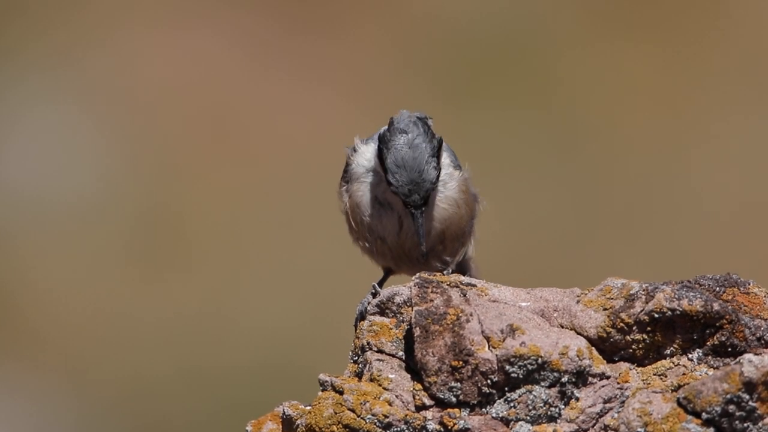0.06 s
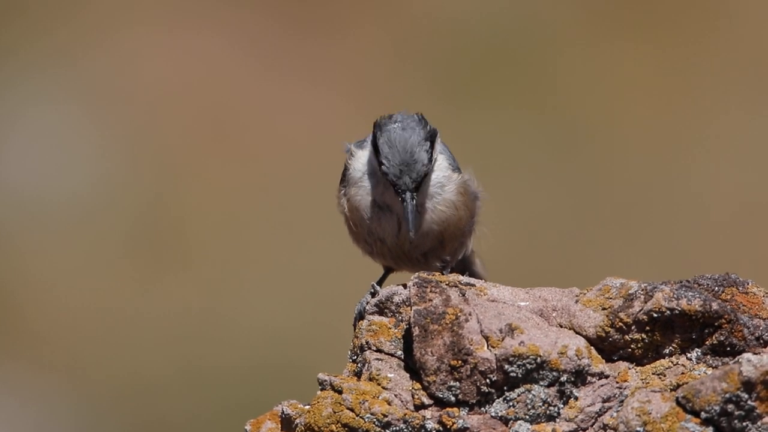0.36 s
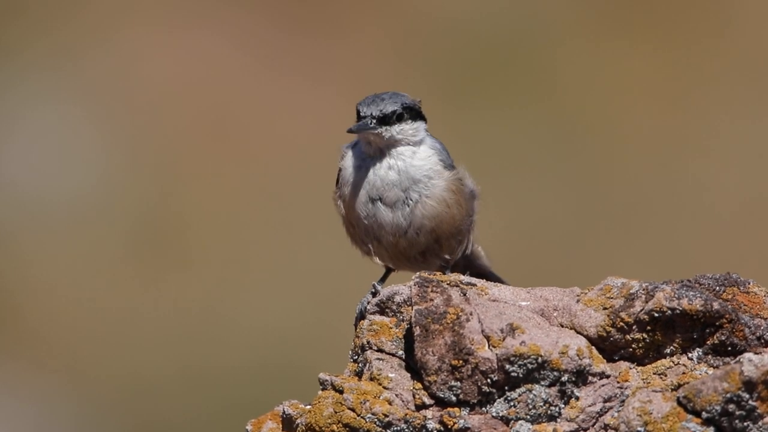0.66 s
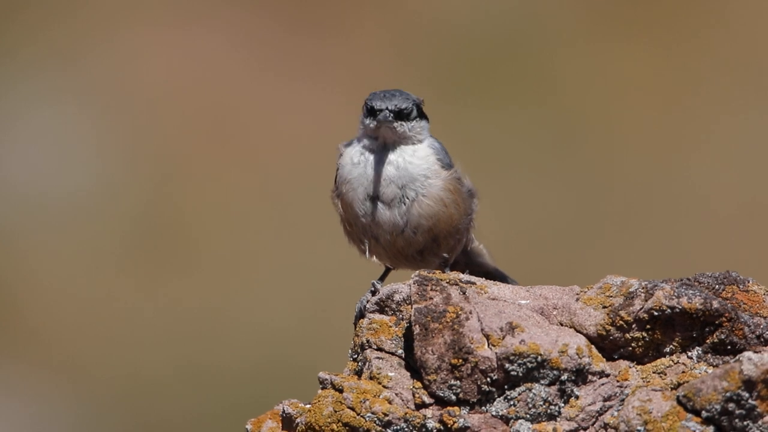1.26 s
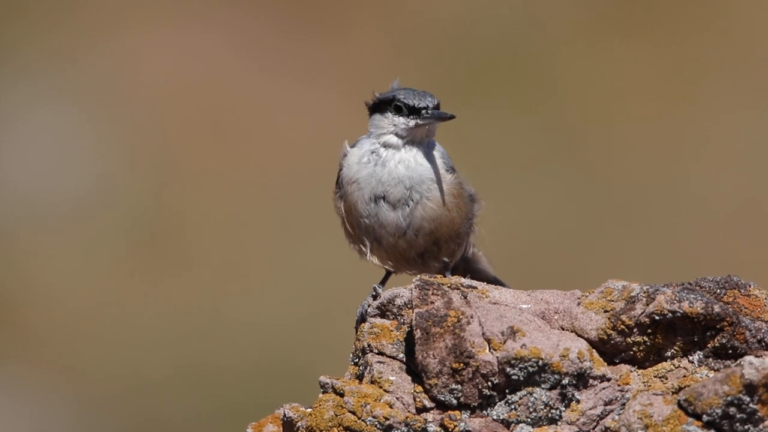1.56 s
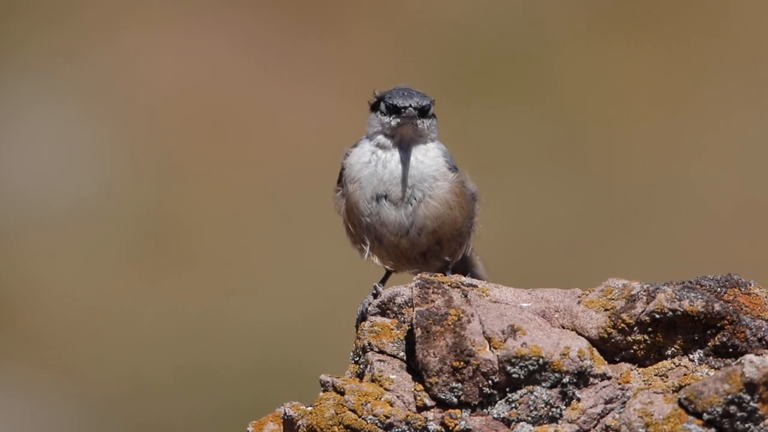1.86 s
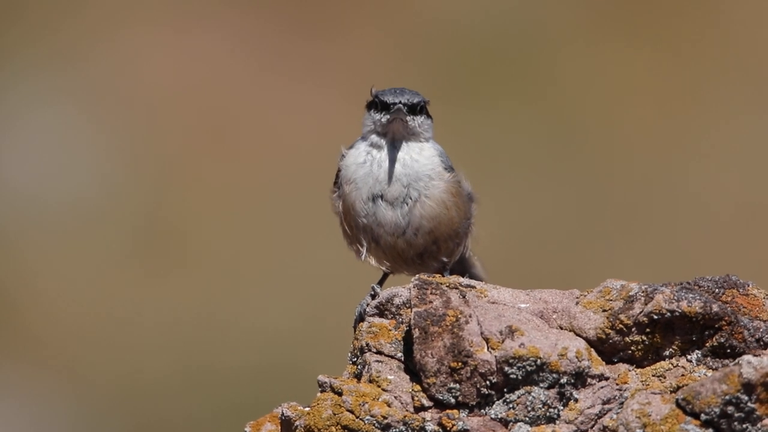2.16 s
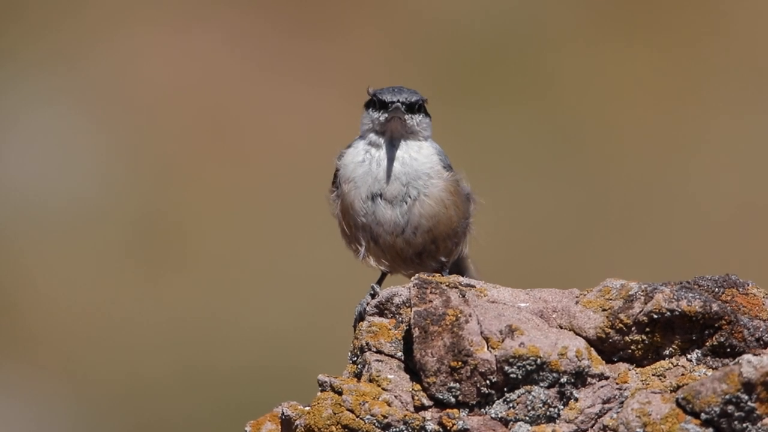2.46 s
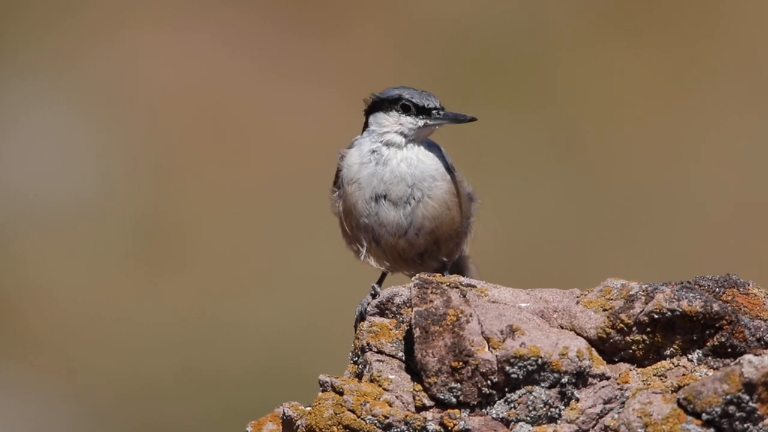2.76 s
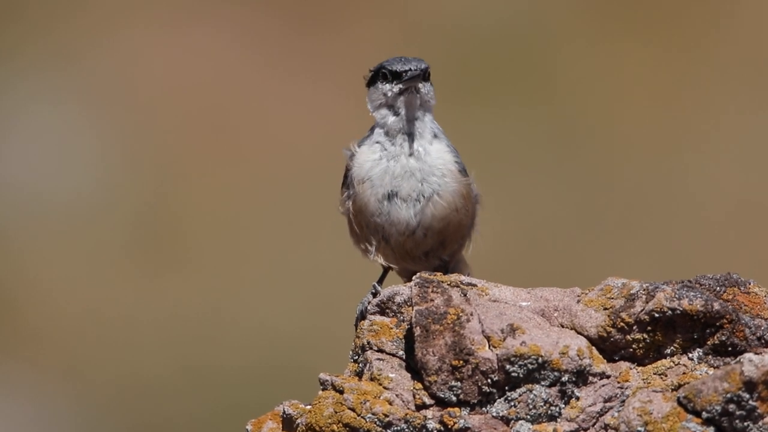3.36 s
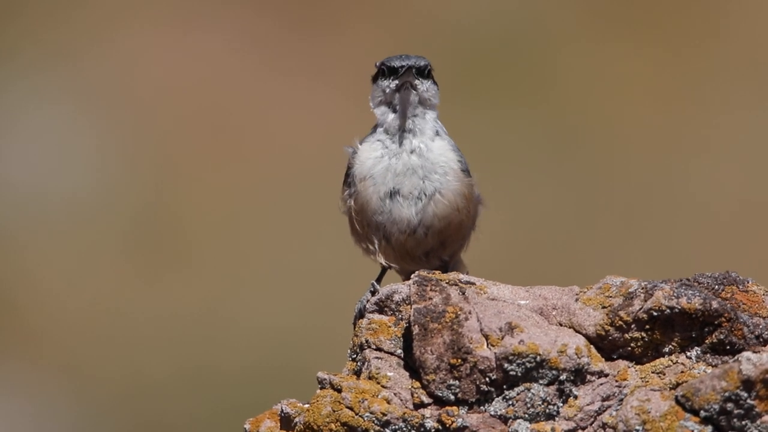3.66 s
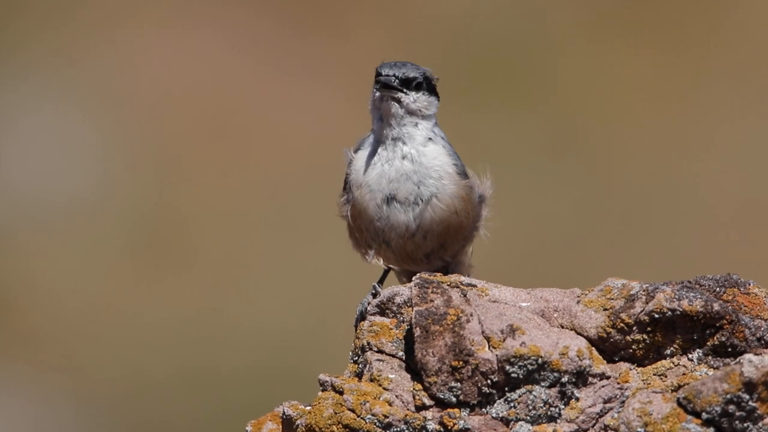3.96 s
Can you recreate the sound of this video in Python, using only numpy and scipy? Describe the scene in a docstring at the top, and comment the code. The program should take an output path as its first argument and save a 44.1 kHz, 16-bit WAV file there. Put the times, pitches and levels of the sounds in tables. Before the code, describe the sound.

A small bird gives four loud downward whistles over low wind rumble.

```python
"""Wind rumbles and thumps on the microphone from the start, over a thin, steady hiss.
About three seconds in, a nuthatch on a rock gives four loud whistles that swoop down and flick up.
Each is a near-pure tone that turns reedy at the bottom, where its second harmonic meets the throat
resonance, and a little hoarse with broken half tones. The rock and the far slopes answer faintly."""
import sys
import numpy as np
from scipy import signal
from scipy.fft import rfft, irfft
from scipy.io import wavfile
from scipy.ndimage import uniform_filter1d

SR = 44100
rng = np.random.default_rng(int(sys.argv[2]) if len(sys.argv) > 2 else 0)


def wrap_up_sound(samples):
    """Save the sound to the file named by the first command line argument, as 16-bit audio."""
    columns = np.atleast_2d(samples).T
    # keep every value between -1 and 1, then stretch to whole-number steps
    tamed = np.clip(columns, -1, 1)
    steps = np.round(tamed * 32767).astype(np.int16)
    wavfile.write(sys.argv[1], SR, steps)


N = 176400

# tone colour of the wind's low rumble and of its upper flutter: f/Hz, relative level/dB
RUMBLE_SPECTRUM = [(20, -34), (35, -31), (60, -11), (90, -4.5), (170, 1), (260, -0.5), (350, -3.5),
                   (480, -11), (700, -22), (1100, -31), (2000, -75.5)]
FLUTTER_SPECTRUM = [(150, -23), (400, 5.5), (650, 2.5), (900, -0.5), (1270, -10.5), (1600, -19),
                    (2000, -31), (3000, -47)]
# gusts, as a fader ride for each wind layer: t/s, level/dB before trim
RUMBLE_RIDE = [(0.0, -26.5), (0.04, -26.5), (0.08, -24.5), (0.1, -24.5), (0.24, -29.5), (0.28, -21.5),
               (0.53, -27), (0.89, -22), (0.91, -23.5), (0.96, -19.5), (1.12, -25.5), (1.17, -19),
               (1.2, -28.5), (1.24, -20.5), (1.63, -22.5), (1.66, -27), (1.82, -34), (1.85, -28),
               (1.98, -32), (2.13, -19), (2.16, -27), (2.46, -21.5), (2.48, -25), (2.65, -21),
               (2.75, -27.5), (2.81, -17), (2.84, -23), (3.09, -24.5), (3.11, -25), (3.14, -30.5),
               (3.17, -20), (3.23, -28), (3.27, -21), (3.34, -28.5), (3.43, -20.5), (3.56, -27),
               (3.61, -21), (3.65, -32.5), (3.7, -27.5), (3.73, -29), (3.82, -20), (3.85, -30),
               (3.97, -29.5), (4.0, -39)]
FLUTTER_RIDE = [(0.0, -48), (0.68, -47.5), (0.75, -41), (0.77, -42), (0.81, -35), (0.83, -38),
                (0.86, -32.5), (0.9, -36), (1.05, -36.5), (1.07, -63), (1.14, -38.5), (1.51, -41.5),
                (1.56, -34.5), (1.58, -48), (1.61, -35), (1.69, -59), (1.74, -48.5), (1.8, -60),
                (1.88, -49), (1.92, -53), (2.07, -51), (2.09, -39), (2.21, -44), (2.81, -38), (2.82, -28.5),
                (2.84, -43), (2.9, -43), (3.25, -39), (3.27, -29.5), (3.29, -40), (3.36, -62), (3.45, -31),
                (3.6, -46.5), (3.61, -49), (3.69, -58), (3.8, -41.5), (3.99, -65), (4.0, -46)]
RUMBLE_TRIM_DB, FLUTTER_TRIM_DB = -0.09, 1
EDDY_RATE_HZ, RUMBLE_EDDY_DB, FLUTTER_EDDY_DB = 169, 2, 4.5
# the hardest thumps of wind: start t/s, relative peak level/dB
BUFFET_HITS = [(0.03, -4.5), (0.749, -5), (0.813, -7), (0.871, -5), (1.169, -7.5), (1.494, -29),
               (1.538, -5), (1.593, -9), (2.088, -24), (2.412, -8.5), (2.545, -8), (2.636, -8), (2.818, -9),
               (3.104, -3), (3.157, -8.5), (3.272, -7.5)]
BUFFET_RISE_S, BUFFET_RUMBLE_DB, BUFFET_FLUTTER_DB = .0024, -9, -15.5  # flutter against the rumble hit
# tone colour of the hiss bed: f/Hz, relative level/dB
HISS_SPECTRUM = [(500, -4), (2000, 5), (3200, 2), (4900, -3.5), (7000, -1), (10000, -2.5), (13000, -5.5),
                 (15500, -8.5)]

# the four whistles: start t/s, relative level/dB, then, timed from that start,
# knee t/s, knee f/Hz, bottom t/s, bottom f/Hz, end t/s, end f/Hz
WHISTLES = [(2.981, -5, .062, 1930, .124, 1765, .141, 2608),
            (3.226, -1.5, .054, 2254, .136, 1825, .151, 2000),
            (3.479, -1.5, 0.057, 2356, .139, 1770, 0.1586, 2064),
            (3.745, -0.5, 0.06, 2426, .144, 1757, 0.161, 2010)]
# the pitch dive that opens every whistle: t/s from its start, f/Hz
OPENING_SWOOP = [(0, 4380), (.004, 4050), (.010, 3380), (.015, 3100), (.026, 2820)]
ATTACK_S, RELEASE_S, ROUNDING_S = .0046, .006, .022
# strength of the voice at each pitch: f/Hz, relative level/dB
VOICE_RESPONSE = [(1780, -31.5), (2000, -31), (2200, -23.5), (2450, -24.5), (2730, -15.5), (2860, -21.5),
                  (3030, -17.5), (3350, -26.5), (3700, -22.5), (4300, -32.5)]
JITTER, WAVER, SHIMMER_DB = .005, .0032, 1  # fast and slow pitch wobble (fractions), level tremble
# harmonics 2 to 8 against the fundamental, before throat colour and effort: level/dB
HARMONIC_LEVELS = [-26.5, -35.5, -41, -52, -46, -43, -43]
# the EQ that throat and bill put on the overtones: f/Hz, level/dB
THROAT_EQ = [(3600, 20.5), (4050, 18), (4400, 1.5), (5100, -10), (5600, 0), (6200, 0.5), (7200, 0),
             (8200, 2.5), (10400, 5), (11400, 0), (13300, 10), (15500, -2)]
EFFORT_BRIGHTNESS = .46  # extra dB of overtones per dB of whistle level
FLARE_DB, FLARE_RATE_HZ = 3.5, 74  # each overtone flickers on its own
HOARSE_BELOW_HZ, HOARSE_FADE_HZ, RASP_RATE_HZ = 2154, 90, 200
# half tones at 1.5 x pitch, and the sheen of higher ones: a constant part and what hoarseness adds
HALF_TONE_DB, HOARSE_HALF_TONE_DB = -42, -10.5
SHEEN_DB, HOARSE_SHEEN_DB = -23, -3.5
ROCK_DELAY_S, ROCK_DB = .00194, -15
SLOPES_DB, SLOPES_T60_S, SLOPES_BUILD_S = -23.5, .6, .025


def undb(db):
    """Decibels to gain."""
    return 10 ** (np.asarray(db) / 20)


def unit(x):
    """Scale to an rms of 1."""
    return x / np.sqrt(np.mean(x ** 2))


def gain_at(hz, curve):
    """Gain of an EQ curve (f/Hz, level/dB) at the given frequencies."""
    f, db = np.array(curve, float).T
    return undb(np.interp(np.log(np.maximum(hz, 1)), np.log(f), db))


def noise(curve):
    """Noise coloured by an EQ curve, rms 1."""
    f = np.fft.rfftfreq(N, 1 / SR)
    return unit(irfft(rfft(rng.standard_normal(N)) * gain_at(f, curve), N))


def wobble(rate):
    """Smooth random modulator that changes about rate times a second, rms 1."""
    f = np.fft.rfftfreq(N, 1 / SR)
    return unit(irfft(rfft(rng.standard_normal(N)) * np.exp(-(2 * f / rate) ** 2), N))


def wind(t):
    """Gusts break into quick eddies and buffets on the microphone; strong eddies are brighter."""
    eddies = np.clip(wobble(EDDY_RATE_HZ), -2, 2)
    rumble_gain = undb(np.interp(t, *np.array(RUMBLE_RIDE).T) + RUMBLE_TRIM_DB)
    rumble_gain *= unit(undb(RUMBLE_EDDY_DB * eddies))
    flutter_gain = undb(np.interp(t, *np.array(FLUTTER_RIDE).T) + FLUTTER_TRIM_DB)
    flutter_gain *= unit(undb(FLUTTER_EDDY_DB * eddies))
    buffets = 0
    for start, db in BUFFET_HITS:
        age = np.maximum(t - start, 0) / BUFFET_RISE_S
        buffets += undb(db + BUFFET_RUMBLE_DB) * age * np.exp(1 - age)
    rumble = np.hypot(rumble_gain, buffets) * noise(RUMBLE_SPECTRUM)
    flutter = np.hypot(flutter_gain, undb(BUFFET_FLUTTER_DB) * buffets) * noise(FLUTTER_SPECTRUM)
    return rumble + flutter


def hiss(level_db=-61.5):
    """A thin, steady bed of noise."""
    return undb(level_db) * noise(HISS_SPECTRUM)


def whistle_gesture(t, db, knee_s, knee_hz, bottom_s, bottom_hz, end_s, end_hz):
    """Pitch, strength and brightness of one whistle: a swoop, a rounded slide and a closing flick."""
    path = np.array(OPENING_SWOOP + [(knee_s, knee_hz), (bottom_s, bottom_hz), (end_s, end_hz)])
    hz = np.interp(t, *path.T)
    # round the corners of the glide, most of all at the knee
    rounding = np.interp(t, [OPENING_SWOOP[-1][0], knee_s, bottom_s, end_s], [.13, 1, .44, .076])
    hz += rounding * (uniform_filter1d(hz, int(ROUNDING_S * SR)) - hz)
    gate = np.clip(t / ATTACK_S, 0, 1) * np.clip((end_s - t) / RELEASE_S + .5, 0, 1)
    brightness = np.full(N, undb(EFFORT_BRIGHTNESS * db))
    return np.array([hz, gate * undb(db), brightness]) * (gate > 0)


def nuthatch(t):
    """The syrinx sings a near-pure tone; low down, harmonic 2 rings in the throat and half tones swell."""
    hz, strength, brightness = sum(whistle_gesture(t - start, *shape) for start, *shape in WHISTLES)
    hz *= 1 + JITTER * wobble(rate=430) + WAVER * wobble(rate=84)
    phase = 2 * np.pi * np.cumsum(hz) / SR
    hoarseness = np.clip((HOARSE_BELOW_HZ - hz) / HOARSE_FADE_HZ, 0, 1)
    half_tone_gain = undb(HALF_TONE_DB) + hoarseness * undb(HOARSE_HALF_TONE_DB)
    sheen_gain = undb(SHEEN_DB) + hoarseness * undb(HOARSE_SHEEN_DB)
    tone = np.sin(phase) + brightness * half_tone_gain * rasp(1.5 * phase)
    for harmonic, db in enumerate(HARMONIC_LEVELS, 2):
        flare = brightness * undb(db + FLARE_DB * wobble(FLARE_RATE_HZ)) * (harmonic * hz < SR / 2)
        overtone = gain_at(harmonic * hz, THROAT_EQ) * np.sin(harmonic * phase)
        halfway = harmonic + .5
        sheen = sheen_gain * gain_at(halfway * hz, THROAT_EQ) * rasp(halfway * phase)
        tone += flare * (overtone + sheen)
    shimmer = undb(SHIMMER_DB * wobble(rate=450))
    return strength * gain_at(hz, VOICE_RESPONSE) * shimmer * tone


def rasp(phase):
    """The grit in the voice: a tone whose strength and phase keep breaking up."""
    return (wobble(RASP_RATE_HZ) * np.sin(phase) + wobble(RASP_RATE_HZ) * np.cos(phase)) / np.sqrt(2)


def rock_reflection(t, song):
    """The rock under the bird throws back one quick early reflection."""
    return undb(ROCK_DB) * np.interp(t - ROCK_DELAY_S, t, song)


def slope_echo(t, song):
    """The far slopes scatter the song into a faint tail that blooms and dies away."""
    decay = np.exp(-np.log(1000) * t / SLOPES_T60_S)
    bloom = 1 - np.exp(-t / SLOPES_BUILD_S)
    tail = rng.standard_normal(N) * decay * bloom
    return undb(SLOPES_DB) * signal.fftconvolve(song, tail / np.linalg.norm(tail))[:N]


def scene():
    """Mono mix of wind, hiss and the bird with its echoes."""
    t = np.arange(N) / SR
    song = nuthatch(t)
    echoes = rock_reflection(t, song) + slope_echo(t, song)
    return (wind(t) + hiss() + song + echoes)[None]


def record(dry):
    """A steep high cut takes off the very top."""
    cutoff_hz = 15700
    return signal.sosfilt(signal.ellip(10, .1, 80, cutoff_hz, fs=SR, output="sos"), dry)


dry = scene()
out = record(dry)
wrap_up_sound(out)
```